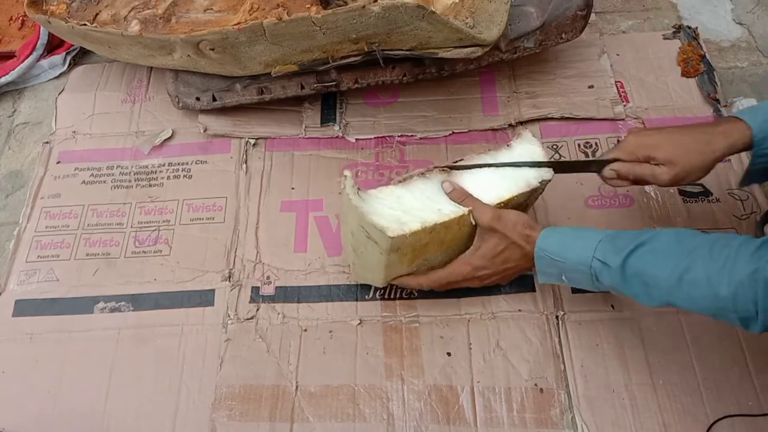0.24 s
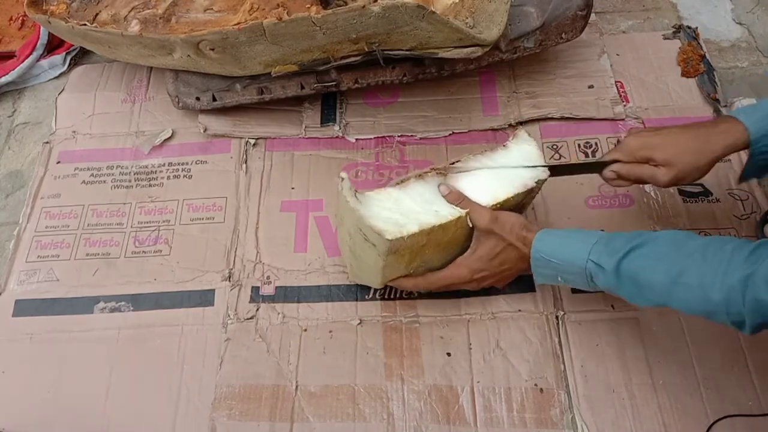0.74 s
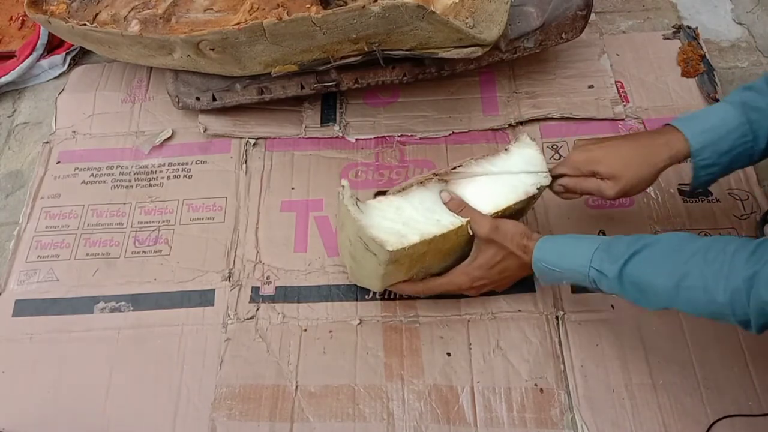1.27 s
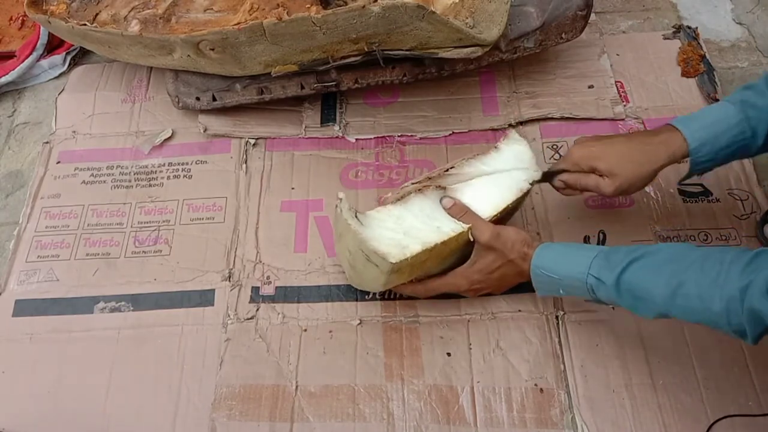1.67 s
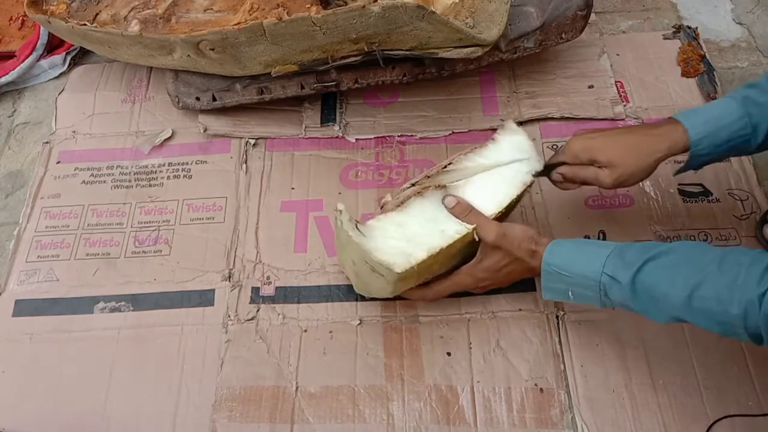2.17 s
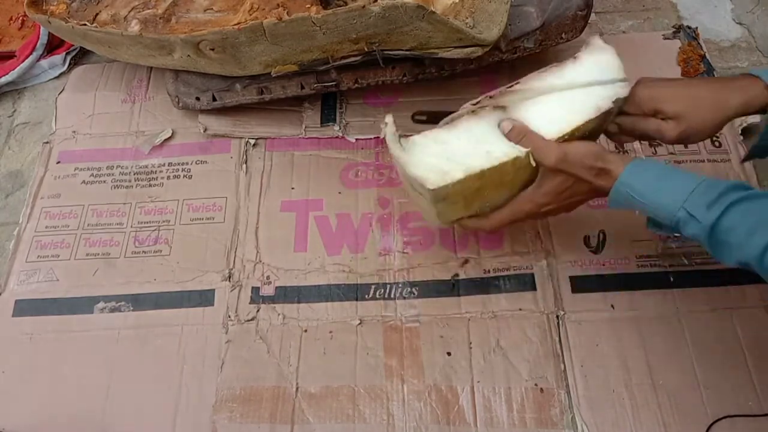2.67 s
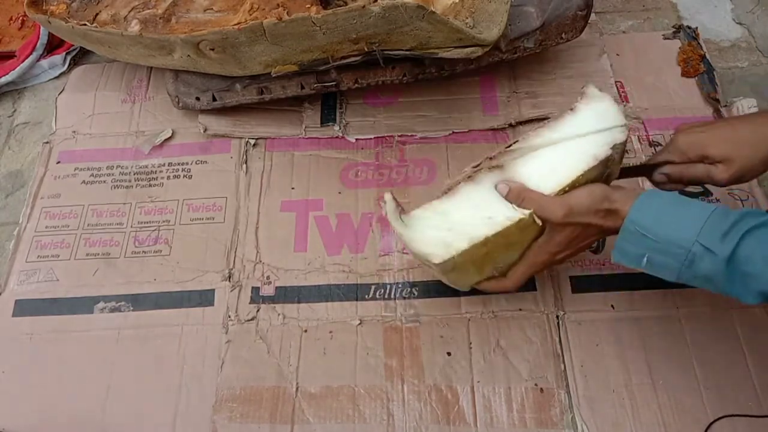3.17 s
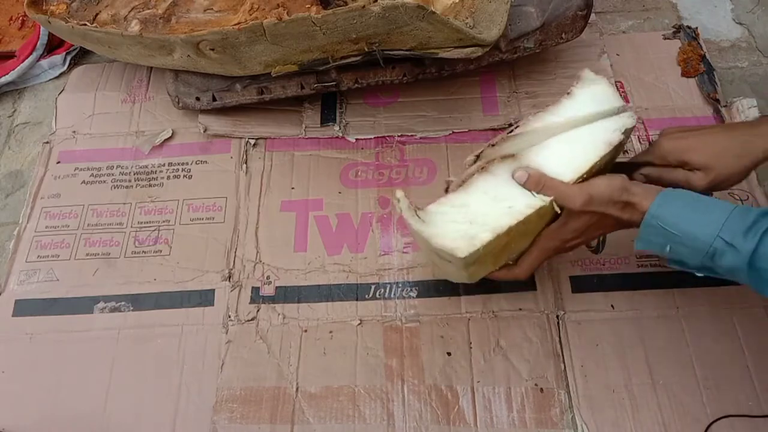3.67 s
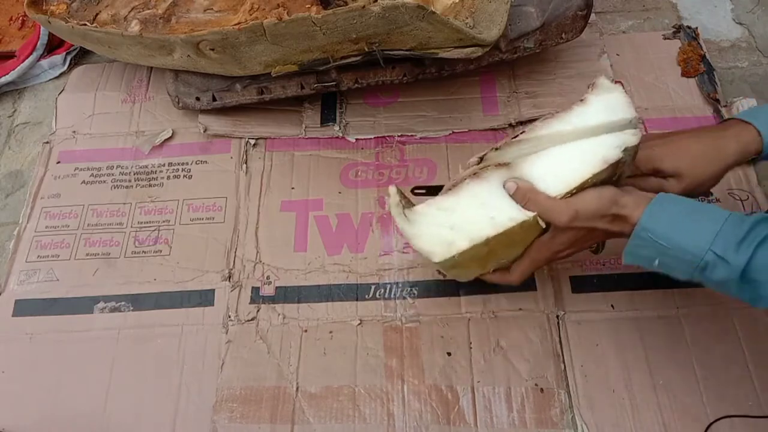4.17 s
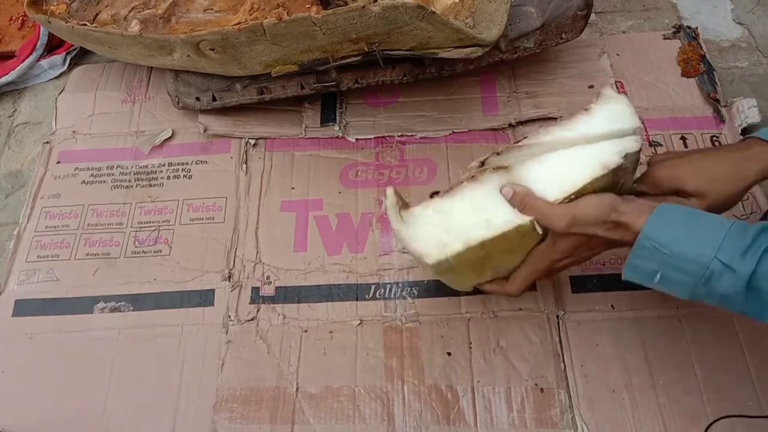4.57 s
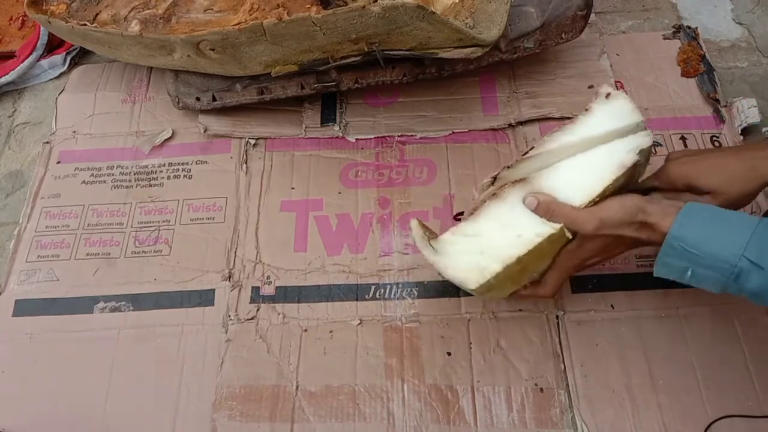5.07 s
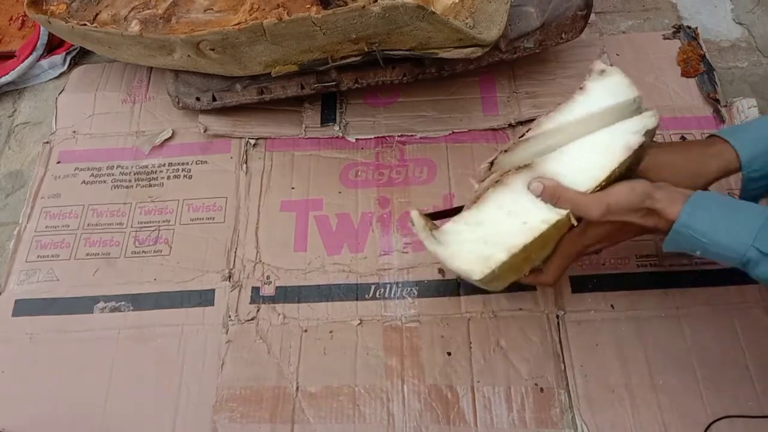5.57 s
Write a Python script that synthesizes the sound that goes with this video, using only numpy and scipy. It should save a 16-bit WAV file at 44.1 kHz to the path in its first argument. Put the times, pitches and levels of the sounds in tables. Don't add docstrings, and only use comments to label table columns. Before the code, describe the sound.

Close to a phone microphone, a toothed blade saws a stiff foam block resting on cardboard. Uneven hollow rasping strokes come first, with small dry cracks. A bird whistles and trills across a walled yard. The block is then lifted, its tone turns higher and more ringing, and the strokes settle into a steady to-and-fro before it sinks back down.

```python
import sys
import numpy as np
from scipy import signal
from scipy.fft import rfft, irfft
from scipy.io import wavfile
from scipy.ndimage import uniform_filter1d, map_coordinates

SR = 44100
rng = np.random.default_rng(int(sys.argv[2]) if len(sys.argv) > 2 else 0)


def file_out(sig):
    cols = np.atleast_2d(sig).T
    lim = np.clip(cols, -1, 1)
    pcm = np.round(lim * 32767).astype(np.int16)
    wavfile.write(sys.argv[1], SR, pcm)


def field_ratio(decibels):
    return 10 ** (np.asarray(decibels, dtype=float) / 20)


N = 257014

# time in seconds, share lifted 0-1.
LIFT = [
    (2.1, 0),
    (2.6, 0.94),
    (4.3, 0.77),
    (5.2, 0.09),
]


def unit(x):
    return x / np.sqrt(np.mean(x ** 2) + 1e-20)


def along(points, hz):
    f, v = np.transpose(points)
    return np.interp(np.log(hz + 1), np.log(f + 1), v)


def curves(rows):
    s, *cols = np.transpose(rows)
    return [np.interp(np.arange(N) / SR, s, c) for c in cols]


def wobble(rate):
    return map_coordinates(rng.standard_normal(N // 8), [np.arange(N) * rate / SR])


def song():
    # top in seconds, rise in s, sag in s, top pitch in Hz, level in dB.
    hooks = [
        (.85, .028, .035, 4700, -30),
        (1.078, .003, .038, 5330, -32),
        (1.16, .004, .045, 4270, -43),
        (3.655, .022, .03, 5550, -48),
        (2.34, .06, .035, 4680, -37),
        (2.617, .009, .038, 5200, -41),
    ]
    # start in seconds, hold in s, drop in s, end pitch in Hz, level in dB.
    falls = [
        (.594, .012, .05, 2480, -44),
        (1.728, .014, .033, 1900, -58),
        (2.025, .035, .045, 2300, -40),
    ]
    # start in seconds, length in s, pitch in Hz, level in dB.
    pips = [
        (2.45, 0.019, 3760, -44.5),
        (3.515, .035, 3666, -46),
        (3.583, 0.031, 4430, -39.5),
        (3.614, 0.015, 4854, -36),
    ]
    rise_hz_per_s, sag_hz_per_s, burst_db_per_s, sag_db_per_s = 30000, 14500, 900, 250
    held_hz = 3570
    notes = []
    for s, up, sag, hz, db in hooks:
        burst_db = min(burst_db_per_s * .4 * up, 18)
        notes.append([(s - up, hz - rise_hz_per_s * up, db - 26),
                      (s - .4 * up, hz - .6 * rise_hz_per_s * up, db - burst_db),
                      (s, hz, db),
                      (s + sag, hz - sag_hz_per_s * sag, db - sag_db_per_s * sag)])
    for s, hold, drop, hz, db in falls:
        notes.append([(s, held_hz, db - 6),
                      (s + hold, held_hz - 60, db),
                      (s + hold + drop / 2, .4 * held_hz + .6 * hz, db - 1.5),
                      (s + hold + drop, hz, db - 9)])
    for s, long, hz, db in pips:
        notes.append([(s, hz - 130, db - 9), (s + 0.5 * long, hz, db), (s + long, hz + 15, db + 1)])
    return notes


def whistle(s, hz, db):
    out = np.zeros(N)
    fade = signal.windows.tukey(len(hz), .2)
    tone = np.sin(2 * np.pi * np.cumsum(hz) / SR)
    out[round(s * SR):][:len(hz)] = np.sqrt(2) * field_ratio(db) * fade * tone
    return out


def bird(chirps_per_s):
    # time in seconds, top pitch in Hz, bottom pitch in Hz, level in dB.
    trills = [
        [(1.175, 4200, 3600, -47), (1.2, 4200, 3300, -44), (1.25, 4200, 2800, -47), (1.335, 3950, 2400, -52)],
        [(3.66, 5300, 4800, -48), (3.69, 5050, 4400, -43), (3.72, 4800, 4150, -46), (3.79, 4400, 3700, -55)],
    ]
    out = np.zeros(N)
    for note in song():
        s, hz, db = np.transpose(note)
        t = np.arange(s[0], s[-1], 1 / SR)
        out += whistle(s[0], np.interp(t, s, hz), np.interp(t, s, db))
    for run in trills:
        s, top, bottom, db = np.transpose(run)
        t = np.arange(s[0], s[-1], 1 / SR)
        rate = chirps_per_s * (1 + .3 * wobble(70)[:len(t)])
        u = np.sin(np.pi * np.cumsum(rate) / SR) ** 2
        hz = np.interp(t, s, top) * (1 - u) + np.interp(t, s, bottom) * u
        hz = hz + 80 * wobble(500)[:len(t)]
        level_db = np.interp(t, s, db) - 9 * (2 * u - 1.15) ** 2 + 4 * wobble(170)[:len(t)]
        out += whistle(s[0], hz, level_db)
    return out * field_ratio(1.5 * wobble(150))


def yard(x, echo_s, echo_db, wet_db):
    # frequency in Hz, t60 in s.
    t60_s = [(2000, .14), (5000, .12)]
    hz, t, z = signal.stft(rng.standard_normal(SR // 2), SR, nperseg=256)
    decay = field_ratio(-60 * t / along(t60_s, hz)[:, None])
    tail = signal.istft(z * decay, SR, nperseg=256)[1]
    smear = signal.fftconvolve(x, tail / np.linalg.norm(tail))[:N]
    echo = np.pad(.45 * x + smear, (round(echo_s * SR), 0))[:N]
    return x + field_ratio(wet_db) * smear + field_ratio(echo_db) * echo


def snaps():
    # start in seconds, peak in dB, centre in Hz.
    cracks = [
        (.147, -42, 5450),
        (.171, -41, 5400),
        (0.3677, -24, 3500),
        (0.703, -36, 4530),
        (3.6654, -67, 6870),
        (3.7633, -34, 5990),
    ]
    out, t = np.zeros(N), np.arange(900) / SR
    for s, db, hz in cracks:
        band = signal.butter(2, [hz / 1.8, hz * 1.45], "bandpass", fs=SR, output="sos")
        burst = field_ratio(db - 3 - 60 * t / 0.014) * rng.standard_normal(len(t))
        out[round(s * SR):][:len(t)] += signal.sosfilt(band, burst)
    return out


def body(x, spectrum):
    cep = irfft(np.log(field_ratio(along(spectrum, np.fft.rfftfreq(8192, 1 / SR))) + 1e-6))
    cep[1:4096] *= 2
    cep[4097:] = 0
    return unit(signal.fftconvolve(x, irfft(np.exp(rfft(cep))))[:N])


def grains(per_s, spread_db):
    chance, size, sign = rng.random(N), rng.standard_normal(N), rng.standard_normal(N)
    return unit((chance < per_s / SR) * field_ratio(spread_db * size) * np.sign(sign))


def patchy(x, depth_db):
    z = signal.stft(x, nperseg=512)[2]
    field = uniform_filter1d(rng.standard_normal(z.shape), size=7, axis=0)
    field = uniform_filter1d(field, size=8, axis=1)
    return unit(signal.istft(z * field_ratio(depth_db * unit(field)), nperseg=512)[1][:N])


def pressure():
    bite_at = [-.03, .225, .412, .744, .936, 1.074, 1.343, 1.531, 2.049, 2.652, 3.025, 3.392, 3.7, 4.103,
               4.472, 4.822, 5.206, 5.57]
    # length in s, block level in dB, tooth rate in Hz, rasp in dB re block,
    # tooth share in dB.
    bites = [(0.0691, -26.5, 220, -20, 0.5), (0.111, -29.5, 400, -24.5, 4.5),
             (.18, -29.5, 360, -18.5, -3.5), (.1, -26.5, 670, -25.5, 2), (0.072, -27, 570, -22.5, -6),
             (0.0676, -27, 570, -26, 2.5), (0.1061, -28, 520, -25.5, 2), (0.049, -24, 540, -25, -5),
             (.062, -28, 600, -23.5, 3.5), (.078, -24.5, 720, -16.5, 0), (0.0749, -27.5, 430, -18.5, -3),
             (.075, -21.5, 420, -24, -1.5), (0.078, -26, 400, -23, 0), (0.073, -19.5, 530, -25, -2.5),
             (.076, -33, 360, -21.5, -0.5), (0.1, -24, 540, -23.5, 2.5), (.088, -26, 320, -24.5, -1.5),
             (.078, -24, 560, -23, -0.5)]
    # middle in seconds, half
    # length in s, block level in dB, tooth rate in Hz, rasp in dB re block.
    draws = [(0.391, 0.075, -39.5, 460, -18.5), (1.81, 0.0496, -51, 500, -8.5),
             (1.927, 0.084, -35, 300, -26.5), (2.169, .09, -43, 410, -14),
             (2.541, 0.091, -37.5, 220, -21.5), (2.77, .05, -47.5, 500.2, -32),
             (2.913, 0.0843, -33, 500, -26.5), (3.135, 0.03984, -48, 499.8, -32),
             (3.26, 0.093, -29, 500, -29.5), (3.609, 0.08, -26.5, 820, -29),
             (3.896, 0.02945, -61, 500, -25), (4.015, 0.063, -35, 570, -28.5),
             (4.339, 0.0721, -32, 410, -28.5), (4.736, .065, -34, 670, -27), (5.091, .065, -35, 410, -29),
             (5.458, 0.068, -30.5, 700, -26), (5.812, .06, -31.5, 820, -22.5)]
    # time in seconds, block level in dB.
    surges = [(.232, -31.5), (.757, -27.5), (.8, -27), (0.476, -22.5), (.56, -27.5), (1.077, -20.5),
              (1.127, -20.5), (1.406, -27), (1.576, -49), (2.084, -17), (2.667, -25.5), (2.71, -27.5),
              (3.085, -22), (3.707, -21.5), (3.763, -22.5), (4.138, -18.5), (4.488, -22), (4.898, -18.5),
              (5.238, -33)]
    # time in seconds, block level in
    # dB, rasp in dB re block.
    touch = [(.08, -40, -17.5), (.17, -60, -14.5), (.68, -52.5, -14.5), (1.04, -38.5, -15.5),
             (1.3, -64, -11), (1.62, -44, -14.5), (1.78, -63.5, -7.5), (2.27, -62.5, -5), (2.38, -55, -5),
             (2.83, -52, -20), (3.5, -44.5, -37), (3.93, -72.5, -2.5), (4.25, -58, -42),
             (4.44, -50.5, -15.5), (4.64, -81, -12), (5.16, -48.5, -35), (5.38, -75, -34), (5.53, -49, -24)]
    swells_db = (1.5, 3)
    bite_s, bite_db = .008, 16
    let_go_s, let_go_db, tail_db_per_s = 0.025, 18, 237.5
    arch_db, tail_dull_db = 3, 4
    draw_db, draw_power, draw_tooth_db = 27.5, 2.24, 0.5
    slow_start, slow_end = .25, .12
    surge_rise_s, surge_fall_s = .012, 0.015

    t = np.arange(N) / SR
    touch_db, touch_rasp_db = curves(touch)
    block = field_ratio(2 * touch_db)
    rasp, loose, speed = block * field_ratio(2 * touch_rasp_db), np.zeros(N), []
    for s, (long, db, hz, rasp_db, tooth_db) in zip(bite_at, bites):
        end = s + long + let_go_s
        swell_db = np.interp(np.interp(s, *np.transpose(LIFT)), [0, 1], swells_db)
        corners_s = [s - .07, s - bite_s, s, s + long, end, end + 1]
        corners_db = [-70, -swell_db - bite_db, -swell_db, 0, -let_go_db, -let_go_db - tail_db_per_s]
        power = field_ratio(2 * (db + np.interp(t, corners_s, corners_db)))
        gone = np.interp(t, [s + long, end], [0, 1])
        arch = np.minimum((2 * (t - s) / long - 1) ** 2, 1)
        block = block + power
        rasp = rasp + power * field_ratio(2 * (rasp_db - arch_db * arch - tail_dull_db * gone))
        loose = loose + power * tooth_db
        speed += [(s, hz * (1 - slow_start)), (s + long / 2, hz), (s + long, hz * (1 - slow_end))]
    for s, half, db, hz, rasp_db in draws:
        power = field_ratio(2 * np.maximum(db - draw_db * np.abs((t - s) / half) ** draw_power, -150))
        block = block + power
        rasp = rasp + power * field_ratio(2 * rasp_db)
        loose = loose + power * draw_tooth_db
        speed += [(s - half / 2, hz * (1 - slow_start)), (s, hz), (s + half / 2, hz * (1 - slow_end))]
    total = block.copy()
    for s, db in surges:
        total += field_ratio(2 * (db - 10 * np.where(t < s, (s - t) / surge_rise_s, (t - s) / surge_fall_s)))
    rasp_re_block = rasp * np.sqrt(total / block) / total
    return 10 * np.log10(total), 10 * np.log10(rasp_re_block), curves(sorted(speed))[0], loose / block


def saw():
    # frequency in Hz, level in dB per Hz.
    resting_body = [(76, -50.5), (130, -10.5), (235, -2), (519, -3.5), (854, -9), (1020, -14),
                    (1160, -15.5), (1420, -19), (1820, -27.5), (2200, -24), (2860, -34), (4840, -120)]
    lifted_body = [(76, -47), (130, -13), (264, -5), (391, -4.5), (580, 1), (706, -3), (1060, 1),
                   (1150, -5.5), (1250, -13), (1500, -12.5), (1700, -29), (2200, -43.5), (2860, -49.5),
                   (4840, -120)]
    rasp_colour = [(880, -16.5), (1500, -6.5), (1910, -11.5), (2140, -7.5), (2820, -8), (3420, -3.5),
                   (4580, -2.5), (5170, -10), (5590, -6), (6170, -11), (6630, -6.5), (7420, -18.5),
                   (8200, -21), (10700, -34), (18000, -120)]
    fizz_colour = [(4470, -39), (7500, -7), (8000, -6), (9600, 0), (11200, -7), (13300, -14), (14800, -7),
                   (16000, -9)]
    thud_colour = [(15, -36), (25, -30), (70, 0), (140, 1.5), (170, 0), (220, -32), (370, -120)]
    lifted = np.clip(curves(LIFT)[0], 0, 1)
    block_db, rasp_db, tooth_hz, loose_db = pressure()
    tooth_db = np.interp(lifted, [0, 1], [-5, -7.5])
    fizz_db = np.interp(lifted, [0, 1], [0.5, 0])
    hand_db = np.interp(lifted, [0, 1], [2, 0])
    fizz_db = fizz_db + 0.46 * np.clip(block_db + 25, -16, 0) + 4
    fizz_db = fizz_db - 1.5 * np.arange(N) / SR

    bite = 2 * np.pi * np.cumsum(tooth_hz * (1 + .085 * wobble(140))) / SR
    grip = field_ratio(0.29 * wobble(70))
    teeth = unit(field_ratio(4.16 * wobble(110)) * (np.sin(bite) + 0.2 * np.sin(2 * bite)))
    cells = grip * grains(per_s=3000, spread_db=2.0)
    tearing = np.sqrt(1 - lifted) * body(cells, resting_body) + np.sqrt(lifted) * body(cells, lifted_body)
    tearing = patchy(tearing, depth_db=4.0)
    soft_db = uniform_filter1d(block_db, size=2600)
    thud = field_ratio(0.92 * soft_db + hand_db - 20.5) * body(rng.standard_normal(N), thud_colour)

    firm = np.clip((block_db + 59.5) / 16, 0, 1)
    share = firm * field_ratio(tooth_db + loose_db)
    boom = (share * teeth + tearing) / np.sqrt(1 + share ** 2)
    bites = grip ** 0.27 * (1 + 0.15 * np.sin(bite))
    rasp = patchy(body(bites * grains(per_s=18000, spread_db=2.5), rasp_colour), depth_db=4.0)
    whisper = signal.sosfilt(signal.butter(4, 2700, "highpass", fs=SR, output="sos"), rasp)
    rasp = whisper + firm * (rasp - whisper)
    fizz = patchy(body(bites * grains(per_s=14000, spread_db=4.5), fizz_colour), depth_db=3.0)
    faces = field_ratio(rasp_db) * (field_ratio(9.0) * rasp + field_ratio(fizz_db) * fizz)
    return field_ratio(block_db) * (boom + faces) + thud


def scene():
    far_bird = yard(bird(chirps_per_s=98), echo_s=.047, echo_db=-10, wet_db=-3.5)
    return (saw() + snaps() + far_bird)[None]


def gate(x):
    threshold_db, ratio = -56, 1.6
    level_db = 10 * np.log10(np.abs(uniform_filter1d(x ** 2, size=900, axis=-1)) + 1e-12)
    gain_db = ratio * np.minimum(level_db - threshold_db, 0)
    return x * field_ratio(uniform_filter1d(gain_db, size=500, axis=-1))


def band_limit(x):
    return signal.sosfilt(signal.butter(12, 16840, fs=SR, output="sos"), x)


def record(dry):
    ceiling = .36
    limited = dry / (1 + np.abs(dry / ceiling) ** 4) ** (1 / 4)
    band = signal.ellip(10, .3, 70, 15500, fs=SR, output="sos")
    mix = signal.sosfiltfilt(band, gate(limited))
    return band_limit(mix)


dry = scene()
out = record(dry)
file_out(out)
```